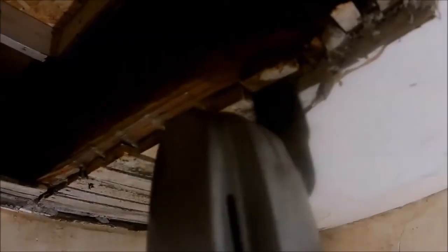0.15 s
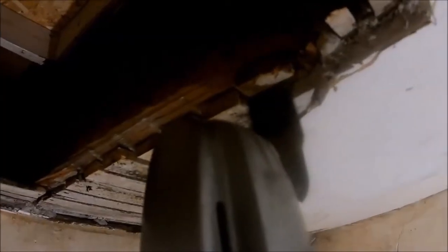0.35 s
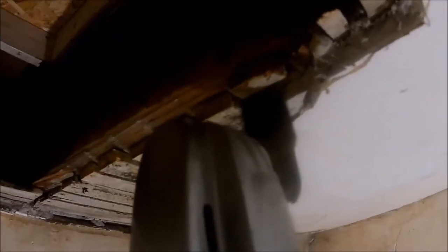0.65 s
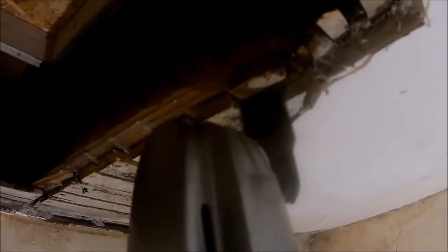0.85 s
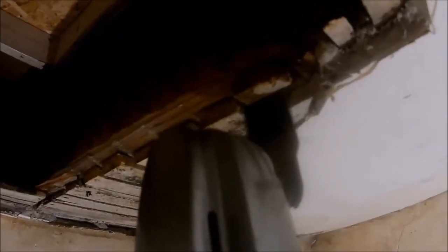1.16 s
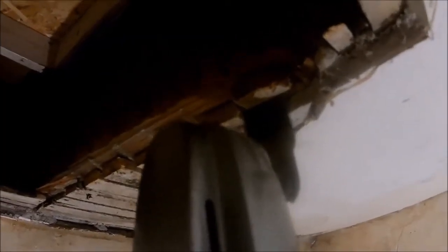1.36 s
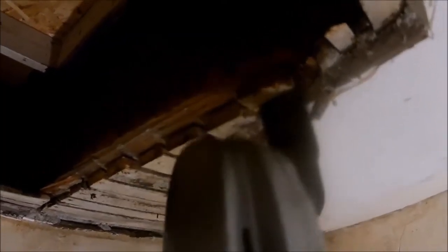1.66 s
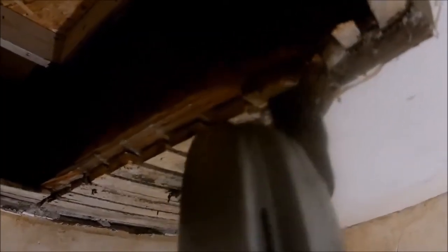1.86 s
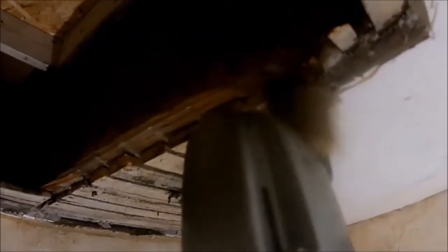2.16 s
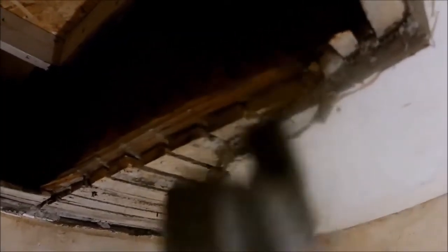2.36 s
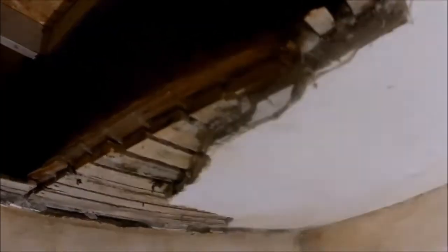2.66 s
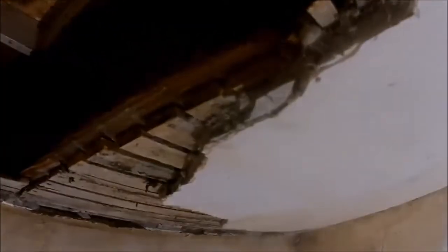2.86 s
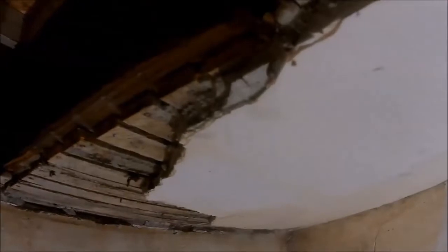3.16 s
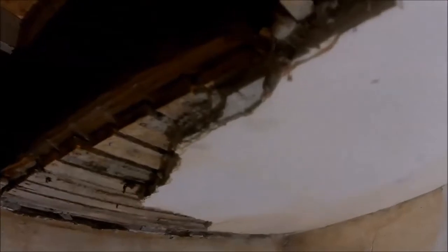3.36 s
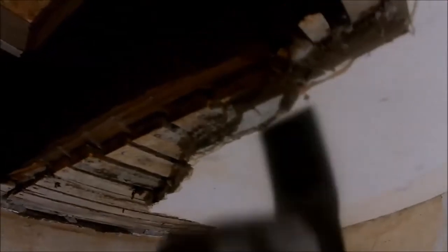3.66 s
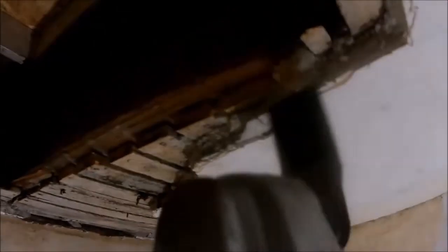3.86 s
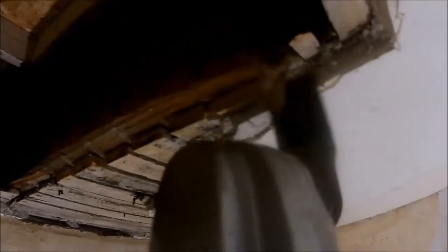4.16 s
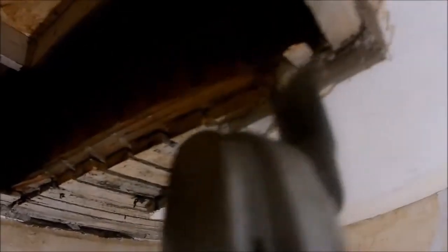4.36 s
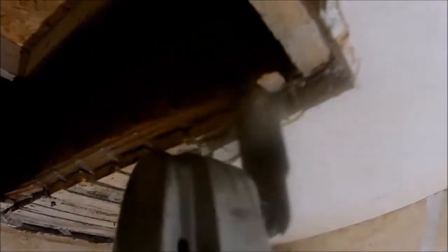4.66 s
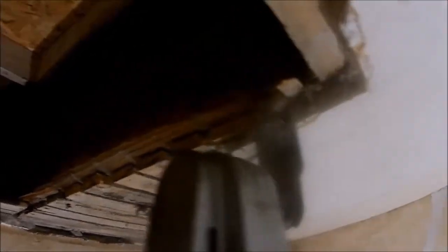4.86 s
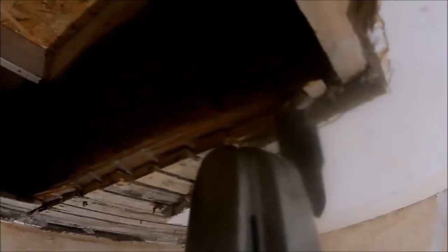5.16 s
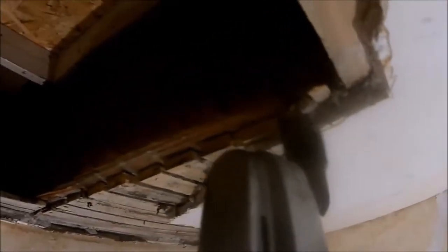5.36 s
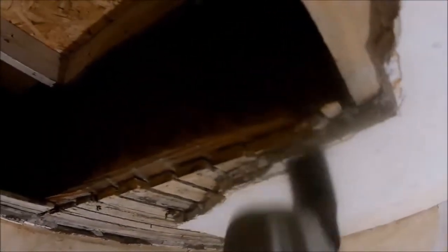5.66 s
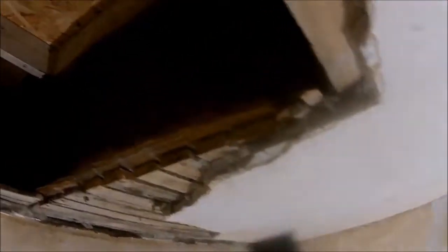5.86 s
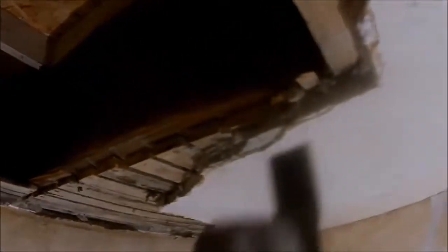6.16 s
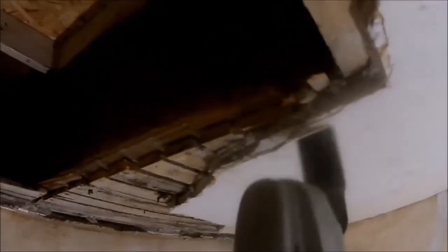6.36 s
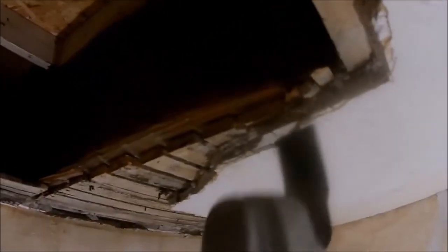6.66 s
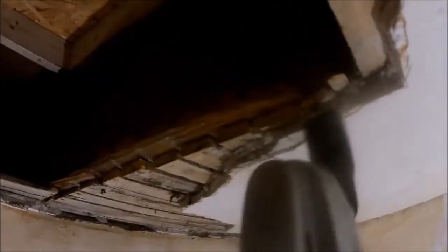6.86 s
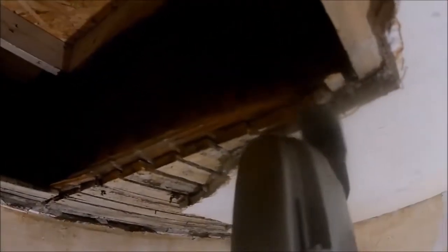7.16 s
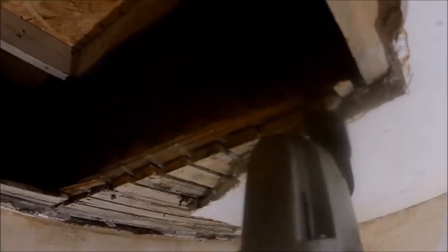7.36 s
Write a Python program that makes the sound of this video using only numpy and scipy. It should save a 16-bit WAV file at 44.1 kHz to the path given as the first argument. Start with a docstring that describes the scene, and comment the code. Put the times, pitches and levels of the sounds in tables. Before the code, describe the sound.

Right up close indoors, an electric oscillating cutter buzzes without pause. It labours in lath and plaster with sagging pitch and a metallic ring, crunches near one second, climbs and runs free and quieter around two and a half, then bites again with scraping, thin squeals and small plaster cracks. The microphone is slightly overloaded.

```python
"""A harsh buzz runs throughout: an oscillating multi-tool, right beside the microphone, saws a lath-and-plaster ceiling.
The buzz is a sum of stroke harmonics that sags in pitch while the blade binds and recovers when it runs free.
Pulsed noise makes the drive rattle, the scrape and the ringing blade and laths; wandering tones make the bearings.
Motor air flutters at the microphone, plaster breaks in showers of grains, and the blade squeals in short fits.
The din overloads the microphone, and gain control steadies the level."""
import sys
import numpy as np
from scipy import signal
from scipy.fft import rfft, irfft, next_fast_len
from scipy.io import wavfile
from scipy.ndimage import uniform_filter1d

SR = 44100
rng = np.random.default_rng(int(sys.argv[2]) if len(sys.argv) > 2 else 0)


def wrap_up_sound(samples):
    """Save the sound to the file named by the first command line argument, as 16-bit audio."""
    columns = np.atleast_2d(samples).T
    # keep every value between -1 and 1, then stretch to whole-number steps
    tamed = np.clip(columns, -1, 1)
    steps = np.round(tamed * 32767).astype(np.int16)
    wavfile.write(sys.argv[1], SR, steps)


N = 330913
TIME = np.arange(N) / SR


def amp(db):
    """Decibels to gain."""
    return 10 ** (np.asarray(db) / 20)


def evened(x):
    """Scales to rms 1."""
    return x / np.sqrt(np.mean(x ** 2) + 1e-20)


def curves(rows):
    """Each column of a table, joined by straight lines in time."""
    seconds, *columns = np.transpose(rows)
    return [np.interp(TIME, seconds, column) for column in columns]


def colour(x, points):
    """Filters by a (frequency [Hz], level [dB]) spectrum; rms 1."""
    size = next_fast_len(N)
    hz, db = np.transpose(points)
    bins_hz = np.fft.rfftfreq(size, 1 / SR)
    gain = amp(np.interp(np.log(bins_hz + 1), np.log(hz), db))
    return evened(irfft(rfft(x, size) * gain, size)[:N])


def drift(rate_hz):
    """Random wander of rms 1: chance values joined by straight lines."""
    steps = rng.standard_normal(4096)
    return evened(np.interp(TIME * rate_hz, np.arange(len(steps)), steps))


def tone(hz):
    """A sine of rms 1 that follows a pitch curve from a random phase."""
    turns = np.cumsum(hz) / SR + rng.random()
    return np.sqrt(2) * np.sin(2 * np.pi * turns)


def swell(start, length, rise):
    """Attack, hold and release between 0 and 1; times in seconds."""
    corners = [0, min(rise, length / 2), max(length - rise, length / 2), length]
    return np.interp(TIME, start + np.array(corners), [0, 1, 1, 0])


def by_state(engagement, states):
    """Blends the values given for each step of engagement."""
    return np.interp(engagement, np.arange(len(states)), states)


# Pace of the blade: (time [s], strokes per second [Hz])
STROKE_SPEED = [(0.0, 293.2), (0.42, 279.5), (1.05, 272.8), (1.2, 274.7), (1.41, 294.4), (1.76, 307),
                (1.9, 305), (2.0, 299.3), (2.11, 302.2), (2.35, 312.8), (3.15, 322.4), (4.38, 322.6),
                (4.55, 319), (4.7, 319.1), (5.2, 304.3), (5.5, 313.1), (5.87, 320), (6.6, 322.7),
                (6.97, 322.6), (7.3, 314.9), (7.5, 300.7)]


def stroke_speed(flutter=0.000703):
    """Strokes per second through the scene, with a slight random flutter."""
    return curves(STROKE_SPEED)[0] * (1 + flutter * drift(60))


# Grip of the cut on the blade: (time [s], engagement [0 free, 1 grazing, 2 cutting, 3 bound, 4 jammed])
BLADE_ENGAGEMENT = [(0, 2.5), (.2, 3), (1.05, 3.5), (1.25, 2.5), (1.45, 2.5), (1.8, 2.5), (2.2, 2.5),
                    (2.4, 0.9), (2.55, 0), (3.2, 0), (3.4, 1), (4.35, 1), (4.9, 2), (5.35, 2), (5.6, 1),
                    (6.6, 1.25), (7.25, 2.23), (7.5, 2.5)]


def blade_engagement():
    """How firmly the blade is caught in the ceiling, from 0 free to 4 jammed."""
    return curves(BLADE_ENGAGEMENT)[0]


# Harmonics of the stroke: (order, free [dB], grazing [dB], cutting [dB], bound [dB])
STROKE_HARMONICS = [(1, -54.5, -50, -51.5, -53.5), (2, -47, -49.5, -54, -52), (3, -42.5, -41.5, -48, -49.5),
                    (4, -43, -39.5, -41.5, -47), (5, -50, -44.5, -39, -41.5), (6, -42, -44, -44, -39),
                    (7, -45.5, -48.5, -49.5, -41), (8, -73, -57.5, -50.5, -44.5), (9, -48.5, -50, -45, -40),
                    (10, -53.5, -56.5, -56, -47.5), (11, -48, -55, -52.5, -56),
                    (12, -49.5, -53.5, -49, -59), (13, -63, -46, -46, -54), (14, -53.5, -53.5, -54, -52.5),
                    (15, -55.5, -53.5, -57.5, -41.5), (16, -71, -75, -61, -42), (17, -70, -72, -58, -51),
                    (18, -61, -63, -76, -50), (19, -54.5, -61.5, -78, -52), (20, -62, -86, -65, -56.5)]
# Resonances of tool and laths, by their sound: name: (frequency [Hz], half width [Hz], resting boost [dB])
TOOL_RESONANCES = {"hum": (320, 78, 0), "growl": (610, 65, -0.38), "drone": (1260, 90, 0),
                   "whine": (1525, 130, -1.8), "cry": (1900, 132, -2.8), "snarl": (2030, 160, -0.35),
                   "rasp": (2450, 115, 2.5), "clank": (2900, 150, -1.3), "ring": (4230, 128, 0.89),
                   "shriek": (4470, 86, 1.6), "whistle": (5000, 180, 0)}
# Grip and blade angle let one resonance sing out: (start [s], length [s], resonance name, boost [dB])
SINGING_SPELLS = [(-.1, 0.36, "whine", 12), (-.1, 0.33, "cry", 6), (-.1, .5, "growl", 8),
                  (0.147, 0.71, "ring", 6.5), (.25, 0.51, "shriek", 1.5), (0.303, 0.62, "cry", 4.5),
                  (.72, 0.39, "shriek", 7.5), (.76, 0.36, "drone", 11), (1.093, 0.35, "ring", 9.5),
                  (1.25, 0.54, "shriek", 9.5), (1.323, .82, "whine", 8.5), (1.6, 0.51, "growl", 6.5),
                  (1.6, 0.78, "ring", 15), (1.62, 0.44, "cry", 4.5), (1.88, 0.21, "clank", 12),
                  (2.076, 0.28, "shriek", 7), (2.189, .57, "cry", 13), (3.25, 0.854, "hum", 3.5),
                  (3.15, .9, "drone", 1), (4.362, 0.66, "whine", 4), (4.343, 0.47, "cry", 5),
                  (4.62, 0.73, "snarl", 5), (4.948, 0.4, "cry", 10.5), (4.45, .35, "ring", 4.5),
                  (4.8, 0.86, "clank", 3.5), (5.463, .22, "shriek", 19), (5.546, 0.4, "cry", 9.5),
                  (5.923, 0.827, "drone", 4.5), (6.124, .08, "clank", 15), (5.946, 1, "cry", 4.5),
                  (7.173, .28, "rasp", 7.5), (7.12, 0.3, "whistle", 10.5), (7.052, 0.45, "drone", 5),
                  (7.35, .25, "cry", 6)]
SWELL_S = 0.056  # a resonance takes this long to build up and to die away
WAVER_GROWTH = 0.33  # short waves waver more: exponent on the order


def resonance_boosts(slow):
    """Boost of each resonance in dB: its resting value plus the spells in which it sings out."""
    boosts = {name: rest_db for name, (_, _, rest_db) in TOOL_RESONANCES.items()}
    for start, length, name, db in SINGING_SPELLS:
        boosts[name] = boosts[name] + db * swell(start, length, SWELL_S)[slow]
    return boosts


def buzz(speed, waver_db=1.5, waver_hz=34, steadying=0.083, steadying_per_db=0.07, slip_hz=1, bite_db=0.27):
    """Harmonics of the stroke: engagement sets their pattern, the resonances lift or sink them."""
    engagement = blade_engagement()
    slow = slice(None, None, 64)  # levels are worked out at every 64th sample
    boosts = resonance_boosts(slow)
    out = np.zeros(N)
    for order, (_, *states) in enumerate(STROKE_HARMONICS, 1):
        lift = 0
        for name, (hz, width, _) in TOOL_RESONANCES.items():
            distance = (order * speed[slow] - hz) / width
            lift = lift + boosts[name] * np.exp(-.5 * distance ** 2)
        # the moving tool shifts the room's reflections, so each harmonic wavers on its own;
        # less when held firmly or singing
        steadiness = steadying * engagement[slow] + steadying_per_db * lift
        waver = waver_db * order ** WAVER_GROWTH * np.exp(-steadiness)
        db = by_state(engagement[slow], states) + lift + waver * drift(waver_hz)[slow]
        level = amp(np.interp(TIME, TIME[slow], db))
        out += level * tone(order * speed + slip_hz * drift(waver_hz))
    return amp(bite_db * engagement) * out  # a firmer bite is a little louder


def chatter(turns, depth, uneven_db):
    """Noise that bursts at each turn of the blade, no two strokes alike."""
    stroke_db = uneven_db * rng.standard_normal(4096)
    gate = 1 + np.clip(depth, 0, 1) * np.cos(2 * np.pi * turns)
    return gate * amp(stroke_db[turns.astype(int)]) * rng.standard_normal(N)


# Friction, one row per step of engagement, free to jammed: (drive rattle [dB], tooth scrape [dB], blade ring [dB])
FRICTION_LEVELS = [(-32, -52, -48), (-34.5, -45.5, -42), (-36.3, -43, -44), (-40.5, -49, -44.5),
                   (-44, -51, -42.5)]
# The blade judders and friction changes: (start [s], length [s], rattle and scrape boost [dB], ring boost [dB])
JUDDER_SPELLS = [(1.061, 0.081, 8, 9), (1.162, 0.18, 0.5, 0), (1.3, 0.38, 4, 5), (1.88, .1, 2, 12.5),
                 (2.07, 0.257, 4, 5.5), (3.422, 0.18, 0.5, 0), (5.5, 0.19, 0.5, 6.5), (5.7, 1.2, -1, 1.5)]
# Spectrum of the rattling housing: (frequency [Hz], relative level [dB])
RATTLE_SPECTRUM = [(30, -40), (150, -27), (400, -18), (650, -8.5), (780, -9.5), (930, -10), (1200, -2.5),
                   (1750, 1.5), (2300, -10.5), (3300, -16.5), (6000, -17), (7600, -27.5), (8400, -20),
                   (9300, -33), (10500, -32.5), (13000, -53)]
# Spectrum of the scraping teeth: (frequency [Hz], relative level [dB])
SCRAPE_SPECTRUM = [(100, -61), (1800, -1.5), (2450, 5.5), (2900, 1.5), (3350, -8.5), (3800, 3),
                   (5200, -8.5), (7000, -40), (10500, -23), (13000, -25.5)]
# Spectrum of the ringing blade: (frequency [Hz], relative level [dB])
RING_SPECTRUM = [(100, -73), (3200, -34.5), (3900, -12.5), (4300, 3), (4700, -8.5), (5300, -52),
                 (15000, -56)]
# Spectrum of the ringing laths: (frequency [Hz], relative level [dB])
LATH_SPECTRUM = [(100, -29), (380, -16), (470, -9.5), (660, -8), (790, 2), (950, -10), (1600, -29),
                 (5000, -62)]
JUDDER_RISE_S = 0.029
SKID_SCRAPE_DB = 3.5  # extra scrape while the teeth skid


def friction(speed, rattle_db=0.0, scrape_db=2.0, ring_db=-0.1, lath_db=-2, throb_db=1.08, throb_per_stroke=0.064):
    """Play in the drive rattles the housing; the teeth scrape, and set blade and laths ringing."""
    turns = np.cumsum(speed) / SR
    back = turns + .5  # the return stroke
    engagement = blade_engagement()
    rattle, scrape, ring = (by_state(engagement, states) for states in np.transpose(FRICTION_LEVELS))
    for start, length, rough_db, ringing_db in JUDDER_SPELLS:
        flare = swell(start, length, JUDDER_RISE_S)
        rattle = rattle + rough_db * flare
        scrape = scrape + rough_db * flare
        ring = ring + ringing_db * flare
    skid = SKID_SCRAPE_DB * sum(swell(start, length, JUDDER_RISE_S) for start, length, _ in SQUEAL_FITS)
    touch = np.clip(engagement, 0, 1)  # the laths sound only when touched
    throb = throb_db * tone(throb_per_stroke * speed + drift(8))  # the rattle comes in quick waves

    housing = colour(chatter(turns, depth=0.38, uneven_db=0.5), RATTLE_SPECTRUM)
    teeth = colour(chatter(back, depth=0.32, uneven_db=2.0), SCRAPE_SPECTRUM)
    blade = colour(chatter(back, depth=0.42, uneven_db=3.0), RING_SPECTRUM)
    laths = colour(chatter(turns, depth=0.75, uneven_db=4.0), LATH_SPECTRUM)
    return (amp(rattle + rattle_db + throb) * housing
            + amp(scrape + skid + scrape_db) * teeth
            + amp(ring + ring_db) * blade
            + amp(scrape + lath_db) * touch * laths)


# Bearing and fan tones, not locked to the stroke:
# (multiple of the stroke speed, level when free [dB], change per step of engagement [dB], wander [Hz])
BEARING_TONES = [(5.32, -42.5, -3.5, 15.54), (13.44, -56, -8, 18.4), (14, -56.5, 2, 13.2),
                 (30.6, -61, -11, 20)]


def bearings(speed):
    """Fuzzy tones that ride on the motor speed; all but one sink as the blade engages."""
    engagement = blade_engagement()
    out = np.zeros(N)
    for multiple, free_db, step_db, wander_hz in BEARING_TONES:
        level = amp(free_db + step_db * engagement)
        out += level * tone(multiple * speed + wander_hz * drift(90))
    return out


# Cooling air of the motor brushes the microphone: (start [s], length [s], level [dB])
AIR_GUSTS = [(1.699, .55, -69), (3.296, 1.24, -61), (5.95, 0.45, -56)]
GUST_RISE_S, STEADY_AIR_DB = 0.27, -65.5


def draught():
    """A low flutter of air from the vents, in gusts as they turn towards the microphone."""
    gusts = sum(amp(db) * swell(start, length, GUST_RISE_S) for start, length, db in AIR_GUSTS)
    spectrum = [(10, -13), (35, -2.0), (110, -6.0), (250, -0.5), (700, -14), (3000, -60)]
    return (amp(STEADY_AIR_DB) + gusts) * colour(rng.standard_normal(N), spectrum)


# Plaster breaks and the blade knocks: (start [s], decay length [s], grains [dB], dull knock [dB])
PLASTER_BREAKS = [(1.097, 0.036, -27, -49), (1.14, 0.082, -47, -68), (1.929, 0.045, -45, -60),
                  (2.026, 0.022, -43, -63), (4.829, 0.045, -52, -40), (4.873, 0.021, -38, -50),
                  (6.118, 0.018, -30.5, -38.5), (6.152, 0.04, -36, -44), (7.046, 0.042, -33, -63)]
# Spectrum of crumbling grains: (frequency [Hz], relative level [dB])
CRUMBLE_SPECTRUM = [(30, -13), (200, -14), (700, 2), (2500, 13), (8000, -5), (15000, -15)]
# Spectrum of the dull knock: (frequency [Hz], relative level [dB])
KNOCK_SPECTRUM = [(25, -6), (130, -8), (450, 0), (900, -3), (2500, -33)]


def plaster(grains_per_s=2500, spread_db=3, rise_s=0.0037):
    """Each break is a shower of grains over a dull knock of the laths."""
    shower, knock = np.zeros((2, N))
    for start, length, grains_db, knock_db in PLASTER_BREAKS:
        age = np.maximum(TIME - start, 0)
        burst = (1 - np.exp(-age / rise_s)) * np.exp(-(age / length) ** 2)
        shower += amp(grains_db) * burst
        knock += amp(knock_db) * burst
    falls = rng.random(N) < grains_per_s / SR
    sizes = amp(spread_db * rng.exponential(1, N).clip(0, 4))  # a few grains are much louder
    grains = falls * rng.standard_normal(N) * sizes
    return shower * colour(grains, CRUMBLE_SPECTRUM) + knock * colour(rng.standard_normal(N), KNOCK_SPECTRUM)


# The teeth skid and the blade squeals: (start [s], length [s], level [dB])
SQUEAL_FITS = [(3.678, 0.069, -58), (3.862, 0.084, -54), (4.07, 0.3, -56), (4.419, 0.38, -56),
               (5.29, 0.15, -54.5), (6.697, 0.12, -51), (6.818, 0.18, -55)]
# Bending modes of the blade: (frequency [Hz], wander [Hz], relative level [dB])
BENDING_MODES = [(5530, 70, 6.5), (8090, 38.5, -3.5), (9950, 120, -7.5)]


def squeals(stutter_db=3):
    """High bending modes of the blade, excited in fits while the teeth skid."""
    level = np.zeros(N)
    for start, length, db in SQUEAL_FITS:
        progress = np.clip((TIME - start) / length, 0, 1)
        level += amp(db) * np.sqrt(np.sin(np.pi * progress).clip(0))
    stutter = amp(stutter_db * drift(70))
    modes = sum(amp(db) * tone(hz + wander_hz * drift(300)) for hz, wander_hz, db in BENDING_MODES)
    return level * stutter * modes


# Loudness at the microphone, before trim, jolts and tremble: (time [s], relative level [dB])
MICROPHONE_LOUDNESS = [(0, 0.5), (.4, -0.5), (1.2, 0), (1.28, -5), (1.55, -7), (1.7, -1.5), (2.06, -2),
                       (2.18, -8), (2.65, -16), (3.25, -15), (3.5, -5), (4, -6.5), (4.2, -2), (4.6, -2.5),
                       (4.8, -4.5), (5.3, -5), (5.55, -10.5), (6.6, -7), (7.1, -4.5), (7.5, -5.5)]
JOLT_DB = 2.5  # each break shakes the whole tool louder


def scene(trim_db=30, tremble_db=0.47, tremble_hz=14, jolt_rise_s=0.009):
    """All sounds of the tool, swelling together as it bites and nears the microphone in an unsteady hand."""
    speed = stroke_speed()
    tool = buzz(speed) + friction(speed) + bearings(speed) + draught() + plaster() + squeals()
    jolts = JOLT_DB * sum(swell(start, length, jolt_rise_s) for start, length, _, _ in PLASTER_BREAKS)
    tremble = tremble_db * drift(tremble_hz)
    loudness_db = curves(MICROPHONE_LOUDNESS)[0] + jolts + tremble + trim_db
    return (amp(loudness_db) * tool)[None]


def overload(x, lopsided=0.0083, knee=4.5):
    """The microphone saturates with a rounded knee, slightly more on one side, and loses the deepest bass."""
    fine = signal.resample_poly(x, 2, 1)  # doubled rate keeps aliasing down
    push = abs(fine * (1 + lopsided * np.sign(fine)))
    fine = fine / (1 + push ** knee) ** (1 / knee)
    low_cut = signal.butter(1, 35, "high", fs=SR, output="sos")
    return signal.sosfilt(low_cut, signal.resample_poly(fine, 1, 2))


EDGE_HZ = 15750  # upper band limit


def record(dry, target_db=-30, most_gain_db=-16, settle_s=0.057):
    """Overload, gain control that steers towards an even level up to its greatest gain, then the band limit."""
    x = overload(dry[0])
    power = abs(uniform_filter1d(x ** 2, int(settle_s * SR) + 1))
    power_db = 10 * np.log10(power + 1e-12)
    x = x * amp(np.minimum(target_db - power_db, most_gain_db))
    band_limit = signal.firwin(801, EDGE_HZ, window=("kaiser", 9), fs=SR)
    return signal.oaconvolve(x, band_limit, "same")[None]


dry = scene()
out = record(dry)
wrap_up_sound(out)
```